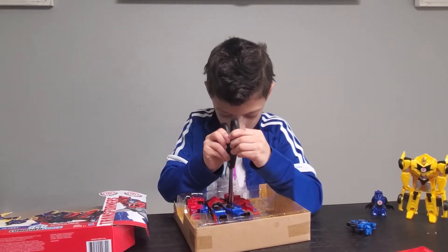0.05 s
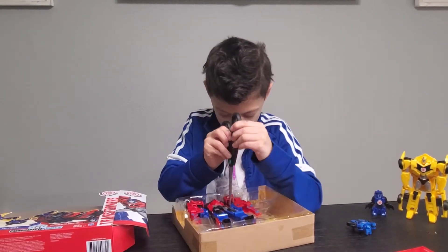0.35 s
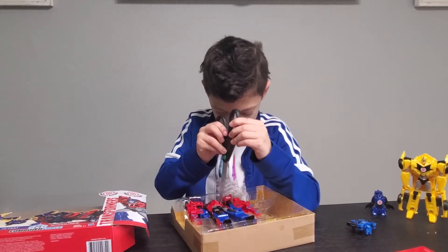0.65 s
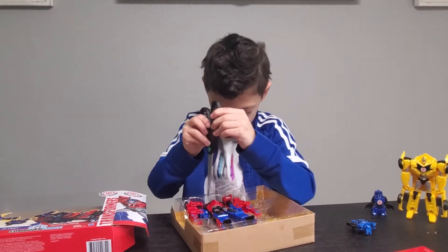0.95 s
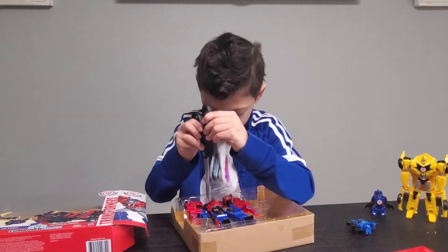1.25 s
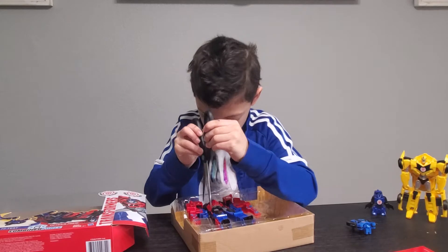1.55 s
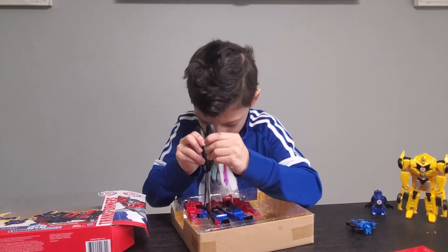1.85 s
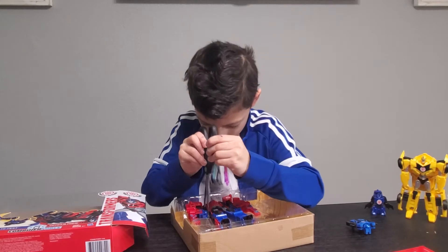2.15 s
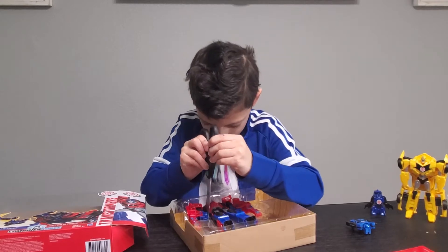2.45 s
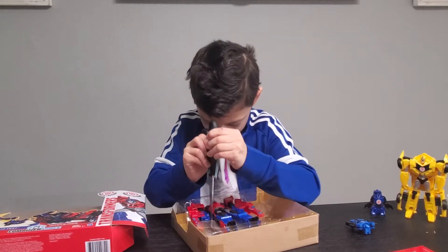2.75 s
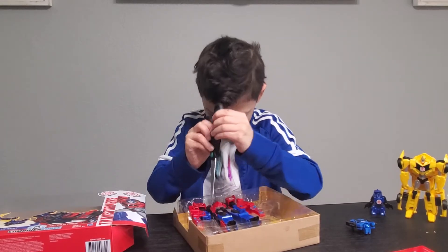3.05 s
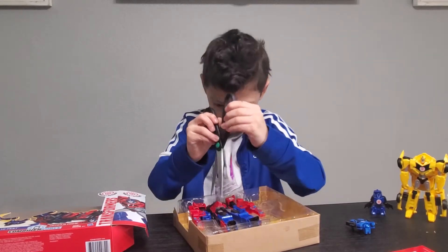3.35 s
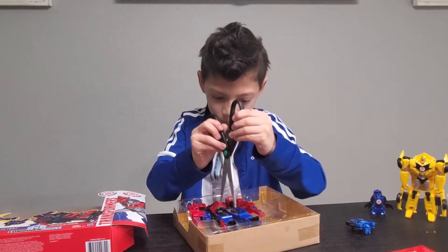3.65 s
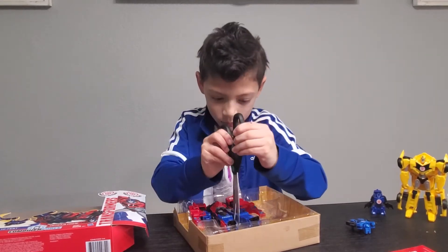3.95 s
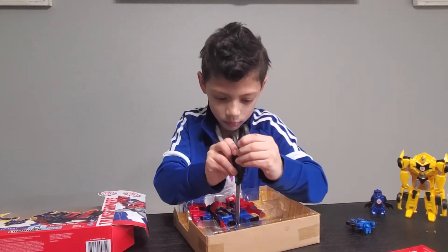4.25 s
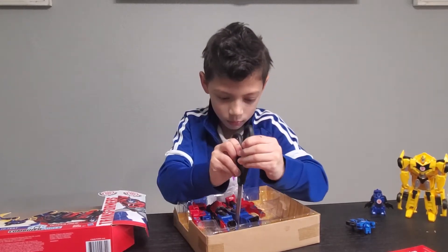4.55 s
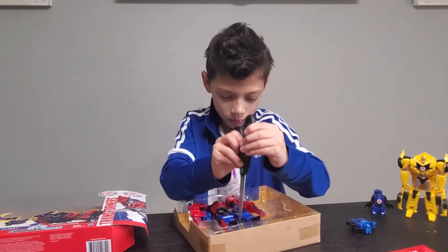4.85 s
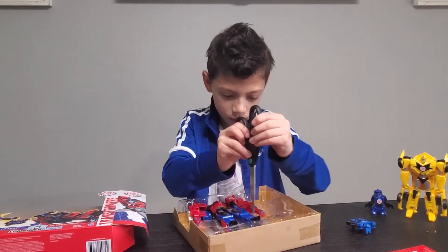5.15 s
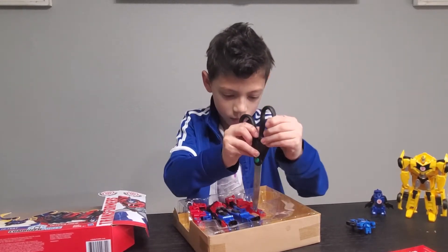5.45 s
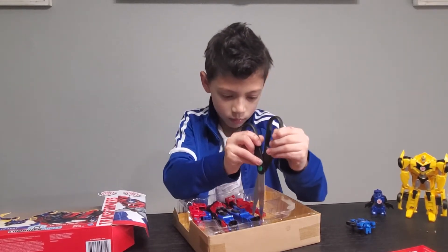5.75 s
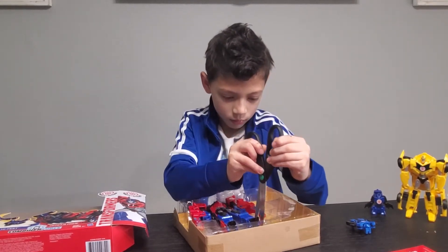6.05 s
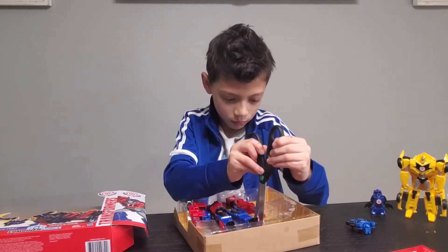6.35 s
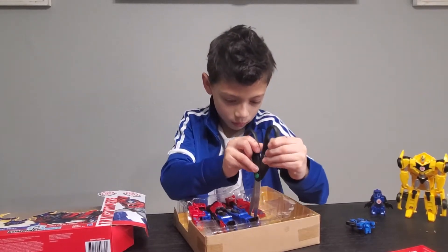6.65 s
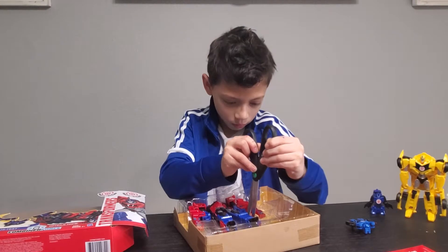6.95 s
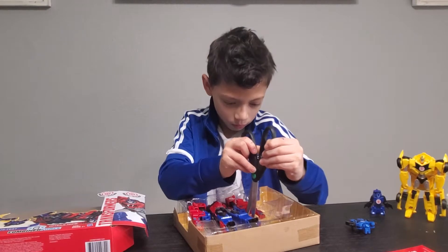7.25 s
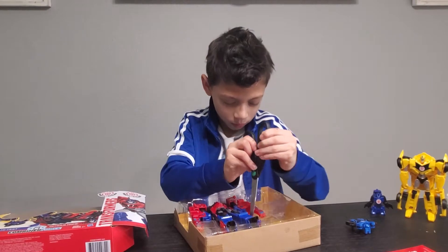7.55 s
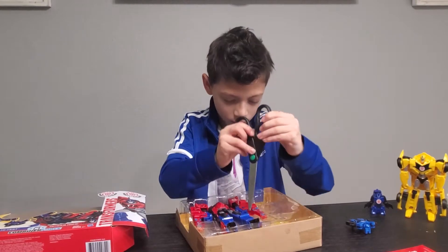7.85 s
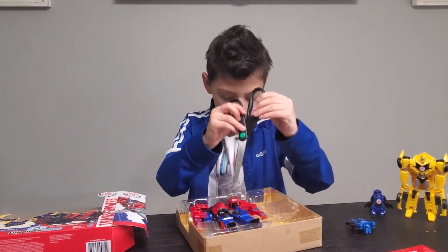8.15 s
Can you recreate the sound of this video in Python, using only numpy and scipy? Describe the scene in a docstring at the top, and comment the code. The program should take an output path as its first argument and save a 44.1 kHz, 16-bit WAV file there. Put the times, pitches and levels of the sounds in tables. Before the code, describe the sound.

Scissors cut a stiff plastic tray inside a cardboard box on a table. The loudest snaps come in the first half second, sharp cracks with hollow knocks, a low table thump and a short scrape. After a pause and a light blade tick at 1.3 seconds, more snaps run from about 1.9 to 2.8 seconds, strongest at 2.3, mixed with dull bumps and tiny steel squeaks. The blades click at 3.3 seconds. Small cracks and crinkles start around 4 seconds, followed by a plastic creak and sharper snaps between 4.5 and 4.8. The blades slide and click at 5.5 seconds. From 5.8 to 7.3 there is quieter bumping, scraping, flexing and crinkling. A final cluster of cracks and squeaks comes around 7.4 to 7.6 seconds. The small bare room rings briefly after each snap, and a faint low hum continues to the end, just past 8 seconds.

```python
"""Scissors cut a stiff plastic blister tray that sits in a cardboard box on a table.
The plastic tears in sharp snaps that knock tray and box, ring the hollow tray and shake the table.
Between snaps the blades bump, scrape, tick and squeak, and the sheet flexes and crinkles.
A small bare room rings after every snap, over a faint low hum."""
import sys
import numpy as np
from scipy import signal
from scipy.fft import rfft, irfft
from scipy.io import wavfile

SR = 44100
rng = np.random.default_rng(int(sys.argv[2]) if len(sys.argv) > 2 else 0)


def write(x):
    x = np.atleast_2d(x).T
    wavfile.write(sys.argv[1], SR, np.round(np.clip(x, -1, 1) * 32767).astype(np.int16))


N = 366768
LEAD = SR // 4  # samples ahead of time zero: the room is already ringing
ONSET_S, MIC_SPACING_M = 0.006, 0.13

# Room rumble. Each row: frequency in Hz, relative level in dB.
RUMBLE_SPECTRUM = [(25, -17), (62, 0), (80, -7.5), (120, -0.5), (300, -10.5), (500, -17), (800, -25),
                   (1300, -34), (2200, -40.5), (4000, -42), (5000, -45.5), (6000, -46), (8200, -51),
                   (13000, -44), (16000, -45.5)]
# Hum and a faint whine. Each row: frequency in Hz, rms level in dB.
HUM_TONES = [(98, -62), (237, -75), (297, -69.5), (3950, -101)]
# Room decay. Each row: frequency in Hz, T60 in seconds.
ROOM_DECAY = [(100, 0.24), (250, 0.6), (550, 0.5), (1400, 0.61), (3700, 0.53), (6000, 0.45), (10000, 0.41),
              (16000, 0.1787)]
# Microphone balance. Each row: frequency in Hz, left minus right in dB.
MIC_BALANCE = [(100, -1), (500, 1), (1000, 2), (2000, 0.8), (4000, -1), (8000, -8), (12000, -1)]

# Low and middle resonances that ring after each knock.
# Each row: frequency in Hz, gain in dB, T60 in seconds.
LOW_RING_MODES = [(187, -1.5, 0.12), (306.3, -2.5, 0.25), (332.7, 0, .18), (367, -6.5, 0.22),
                  (462, -8.5, 0.16), (494, -4.5, 0.079), (552.3, 0, 0.11)]
MID_RING_MODES = [(648, 5, 0.35), (718, 4, 0.16), (959, 0, 0.16), (1132, -1.5, 0.2), (1214, -4, .15),
                  (1370, -4, 0.18), (1760, -6.5, 0.079)]
# Ringing of plastic and blades after a crack, and of the blades alone.
# Each row: frequency in Hz, gain in dB, T60 in seconds.
CRACK_RING_MODES = [(3476, 1.5, 0.1), (3650, 5, 0.18), (3720, 3.5, 0.21), (3670, -0.5, 0.2),
                    (3880, 1.5, 0.16), (4420, -0.5, .15), (4600, -2, .15), (5150, -0.5, .1),
                    (5750, -0.5, 0.078), (6255, -2.5, .07), (6416, 0.5, .09)]
STEEL_MODES = [(3570, -24, 0.087), (4700, -4.5, 0.114), (5130, 7, 0.074), (6160, -1, 0.13), (7030, 13, 0.1),
               (7500, -7, .1), (11100, 13, 0.13), (11200, -12, 0.033), (11840, -12, 0.092), (12490, 5, .12)]
# Source spectra. Each row: frequency in Hz, relative level in dB.
BOX_SPECTRUM = [(40, -25), (100, -1.5), (190, -1), (310, -1), (570, 3), (700, -3.5), (1100, -34.5),
                (3000, -48.5)]
TRAY_SPECTRUM = [(250, -25.5), (480, -4), (650, -5), (1200, -6), (1600, -7), (2200, -6.5), (3200, -4.5),
                 (6000, -34)]
SCRAPE_SPECTRUM = [(100, -15.5), (300, -5.5), (550, -3), (900, -5), (1400, -13), (2400, -11), (3600, -12.5),
                   (6200, -9), (8000, -22), (16000, -24.5)]
TICK_SPECTRUM = [(300, -46), (1500, -29), (2900, -13), (3500, 0), (5500, 0.5), (7200, 4), (9000, -2.5),
                 (11500, 6.5), (16000, 1.5)]
CRACK_SPECTRUM = [(1200, -16), (2000, -3), (2600, -7), (3500, 2.5), (4400, -7.5), (5200, 0.5), (6500, -0.5),
                  (7300, -8), (8200, -23.5), (16000, -43)]
FIZZ_SPECTRUM = [(5000, -24), (7500, -9.5), (9000, -3), (11500, 1), (13500, -1), (16000, -4)]

# Hard cuts rock the table. Each row: start in seconds, gain in dB.
JOLTS = [(.252, -40.5), (4.757, -50.5), (7.52, -50.5)]
# The sheet crinkles. Each row: start in seconds, length in seconds, rms level in dB.
CRINKLES = [(4.029, 0.11, -64.5), (4.207, 0.088, -63.5), (5.801, 0.068, -60.5), (5.912, 0.11, -74),
            (6.402, 0.085, -61.5), (6.61, 0.062, -65.5), (6.921, .1, -65), (7.211, .07, -70),
            (7.49, .08, -51.5)]
# The sheet bends. Each row: start in seconds, length in seconds, level in dB, pitch in Hz.
FLEXES = [(4.48, 0.092, -54.5, 1106), (4.485, 0.048, -52.5, 760), (4.5, 0.081, -47.5, 506),
          (5.75, 0.042, -60, 1140), (6.01, 0.042, -59.5, 840), (6.14, 0.034, -62, 800),
          (6.367, 0.038, -61.5, 954), (6.604, 0.026, -70, 1150), (6.775, 0.039, -63, 873),
          (6.69, 0.048, -66.5, 830), (7.11, .05, -68, 970)]
# Blades drag. Each row: start in seconds, length in seconds, top level in dB, hump centre in Hz.
SCRAPES = [(-.03, 0.072, -51.5, 2010), (0.284, 0.12, -46, 900), (1.858, 0.098, -50, 930),
           (5.725, 0.34, -69.5, 1397), (6.408, 0.091, -59, 2990), (6.596, 0.094, -73.5, 1195),
           (6.904, 0.095, -61.5, 1390), (7.408, 0.24, -64, 900)]
# Blades click home. Each row: start in seconds, click length in seconds, level in dB,
# slide length in seconds, pitch ratio of the steel modes.
TICKS = [(1.298, 0.0076, -48.5, 0.019, 0.92), (3.342, 0.0026, -45, 0.016, 1.06),
         (3.759, 0.0034, -57, 0.0013, 0.87), (5.51, 0.011, -48, 0.061, 0.98),
         (7.355, 0.004, -63, 0.0039, 0.87)]
# Blades squeak. Each row: start in seconds, length in seconds, level in dB, pitch in Hz.
SQUEAKS = [(0.382, .003, -52, 6070), (0.586, 0.0031, -62, 5320), (1.859, 0.00075, -59, 6400),
           (1.872, 0.018, -55, 5300), (1.93, 0.0025, -56, 5400), (2.078, 0.0033, -39.5, 4880),
           (2.805, 0.0048, -36.5, 4970), (3.83, 0.0023, -68, 6670), (3.993, 0.0028, -61.5, 6450),
           (4.191, 0.0039, -63.5, 5570), (4.371, 0.0033, -66.5, 5860), (4.5885, 0.0022, -34, 6000),
           (4.601, 0.0049, -36.5, 5840), (4.741, 0.0032, -43, 4440), (4.756, 0.0032, -42, 6020),
           (6.038, 0.0026, -62.5, 7170), (6.139, 0.007, -70, 7050), (6.228, .0035, -77.5, 7330),
           (6.468, .004, -63, 5830), (6.616, 0.0023, -77, 6050), (6.64, .003, -66, 6600),
           (6.655, 0.0053, -70.5, 7250), (6.792, .0035, -69, 6480), (6.885, 0.0035, -58, 5400),
           (6.978, 0.003, -67.5, 7350), (6.994, 0.0027, -68, 7250), (7.07, 0.0032, -75.5, 7250),
           (7.151, .0035, -78.5, 7350), (7.351, .0035, -59, 6900), (7.39, 0.0024, -53, 5200),
           (7.401, 0.0089, -43, 4930), (7.492, 0.0028, -47, 5000), (7.535, .004, -49.5, 5900),
           (7.612, 0.0043, -62, 5900)]
# A blade slips. Each row: start in seconds, length in seconds, tray level in dB, tray pitch in Hz,
# click relative to tray in dB, box pitch in Hz.
BUMPS = [(-.05, 0.001, -34.5, 915, -14, 466), (0.5425, 0.001, -41, 910, -16, 429),
         (1.912, 0.0056, -47.5, 800, -21, 450), (2.474, 0.0037, -45.5, 900, -14.5, 480),
         (2.821, 0.0039, -44.5, 1190, -19, 496), (4.239, 0.0026, -48.5, 740, -13, 402),
         (4.378, 0.012, -50.5, 830, -10, 535), (4.581, 0.0027, -42, 1020, -14, 330),
         (4.86, 0.0041, -47.5, 907, -14, 400), (5.808, 0.0058, -49, 910, -15, 447),
         (5.834, 0.0053, -51, 930, -11.5, 428), (5.931, 0.0065, -53, 785, -16, 379),
         (5.996, 0.006, -58, 736, -9, 406), (6.017, .005, -57.5, 900, -10.5, 450),
         (6.408, 0.0018, -55, 900, -9, 448), (6.427, 0.01, -62.5, 1400, -8.5, 497),
         (6.468, 0.005, -57.5, 1530, -8, 500), (6.638, 0.0068, -52.5, 766, -19, 503),
         (6.945, 0.0085, -48, 867, -13.5, 406), (7.067, 0.00069, -51, 684, -25.5, 480),
         (7.218, 0.0072, -61.5, 875, -10.5, 400), (7.329, 0.0043, -58.5, 1120, -14.5, 500),
         (7.551, .008, -50, 700, -24, 330), (7.608, 0.0028, -52.5, 804, -17.5, 420),
         (7.618, 0.0053, -46, 995, -11.5, 449)]
# The plastic cracks. Each row: start in seconds, tear length in seconds, crack level in dB and pitch
# in Hz, fizz level in dB, tray level in dB and pitch in Hz, box level in dB and pitch in Hz,
# hollow ring level in dB and pitch in Hz, left minus right of the crack in dB.
SNAPS = [(0.1313, 0.0015, -25.5, 4430, -36.5, -25.5, 756, -31.5, 500.3, -32, 598, 2),
         (0.2253, 0.0087, -30, 5040, -31, -26, 1220, -34, 400, -28, 960, 2),
         (0.2313, 0.0035, -28.5, 4150, -35, -33, 1144, -35, 320, -34.5, 641.4, 1.5),
         (0.3862, 0.0022, -42.5, 5600, -49, -34, 1007, -39.5, 323, -35, 1139, 3),
         (1.857, 0.0016, -62, 5900, -63.5, -51, 870, -52.5, 403, -47.5, 874, -3.5),
         (1.8945, 0.0018, -56, 4540, -62, -46, 1050, -41, 450, -40.5, 943, 5),
         (1.9322, 0.003, -59, 5700, -56, -45.5, 960, -44, 417, -53.5, 625, 4),
         (2.0794, 0.0029, -43, 5260, -48, -43, 940, -41, 394, -42.5, 430.5, -1),
         (2.1, 0.0032, -52.5, 4000, -55, -40, 1410, -43, 480, -48, 446, 10),
         (2.2939, 0.0072, -31, 4480, -38, -31.5, 1230, -30, 420, -34, 561, 1.5),
         (2.7052, 0.0057, -49, 5150, -54.5, -42, 998, -44, 345, -38.5, 971, 0),
         (2.715, 0.014, -46, 4850, -53.5, -47, 1330, -49.5, 332, -45.5, 992, 2),
         (2.7615, 0.0025, -41.5, 4940, -49.5, -39.5, 1045, -41, 400, -35, 940, 2),
         (2.789, 0.0011, -43, 4640, -58, -39, 990, -52, 508, -50, 972, 0),
         (2.8047, 0.0028, -41.5, 4806, -43.5, -39, 974, -39, 460, -44, 596, 2.5),
         (3.9872, 0.0074, -60.5, 6200, -66.5, -54, 1020, -54.5, 500, -59, 790, -2),
         (4.0186, 0.002, -49, 5990, -51, -46, 1220, -48, 453, -67, 1010, 2),
         (4.59, 0.0026, -45.5, 5840, -46.5, -37.5, 950, -37, 330, -37, 317.6, -2),
         (4.6014, 0.002, -42, 6150, -42, -35, 1190, -41.5, 332, -41.5, 568, 5),
         (4.7375, 0.0032, -51, 4300, -56, -35, 890, -37.5, 380, -34.5, 542, 1),
         (4.757, 0.0017, -41.5, 5790, -45, -36, 1716, -39, 483, -32, 549, 2),
         (6.8863, 0.00092, -63.5, 6040, -66, -58.5, 1085, -52, 449, -58.5, 561, -1.5),
         (7.3965, 0.0016, -41.5, 6500, -41.5, -39, 856, -46, 537, -45.5, 915, 0),
         (7.4138, .003, -58, 5220, -59, -36.5, 1200, -37.5, 480, -38, 1362, 0),
         (7.4862, 0.0046, -50, 4800, -56, -37, 901, -40.5, 480, -54, 860, 3),
         (7.537, 0.0037, -55.5, 5400, -62, -55, 1020, -43, 399, -51, 537.4, 4)]


def amp(db):
    """Decibels to gain."""
    return 10 ** (np.asarray(db) / 20)


def lookup(points, hz):
    """Interpolates (Hz, value) rows on a log-frequency axis."""
    row_hz, value = np.transpose(points)
    return np.interp(np.log(hz + 1), np.log(row_hz + 1), value)


def unit_rms(x):
    """Scales to an rms of 1."""
    return x / np.sqrt(np.mean(x ** 2) + 1e-30)


def at_level(x, db):
    """Gives a short sound the energy of 10 ms at this rms level."""
    return x * amp(db) * np.sqrt(SR / 100 / (np.sum(x ** 2) + 1e-30))


def add(mix, start_s, sound):
    """Mixes a sound in at a time."""
    part = mix[..., max(LEAD + round(start_s * SR), 0):][..., :sound.shape[-1]]
    part += sound[..., :part.shape[-1]]


def colour(x, spectrum, centre_hz=None, focus_db=5.5):
    """Minimum-phase filter from a spectrum, with an optional broad hump round a centre."""
    hz = abs(np.fft.fftfreq(4096, 1 / SR))
    db = lookup(spectrum, hz)
    if centre_hz:
        db = db - focus_db * np.minimum(np.log2((hz + 1) / centre_hz) ** 2, 3)
    log_gain = np.log(amp(db))
    taps = np.fft.ifft(np.exp(np.conj(signal.hilbert(log_gain)))).real
    return signal.fftconvolve(x, taps[:len(taps) // 2])[:len(x)]


def ring_modes(push, t, modes):
    """Drives decaying modes; each blow lands elsewhere and weights them anew."""
    hz, db, t60_s = np.transpose(modes)[:, :, None]
    weight, polarity = rng.standard_normal((2, len(modes), 1))
    partials = np.sign(polarity) * amp(db + 2 * weight - 60 * t / t60_s) * np.sin(2 * np.pi * hz * t)
    return signal.fftconvolve(push, partials.sum(0))[:len(t)]


def resonate(push, t, hz, t60_s):
    """Drives one decaying mode, such as the patch of sheet under the blade."""
    return signal.fftconvolve(push, amp(-60 * t / t60_s) * np.sin(2 * np.pi * hz * t))[:len(t)]


def slip_burst(t, length_s, slips_per_s=2500, grit=0.16, whitening=0.98):
    """A quick run of tiny fractures or slips swells and dies, filling the band evenly."""
    slips = rng.standard_normal(len(t)) * (grit + (rng.random(len(t)) < slips_per_s / SR))
    age = 4 * np.maximum(t - ONSET_S, 0) / length_s
    spectrum = rfft(slips * age ** 2 * np.exp(-age))
    white = irfft(spectrum / (abs(spectrum) + 1e-9) ** whitening, len(t))
    return white * np.minimum(t / ONSET_S, 1) * np.exp(-(t / (ONSET_S + length_s) / 4) ** 2)


def shiver(x, t, decay_s, db):
    """Adds a noise tail: dense modes keep shivering after a blow."""
    power = signal.fftconvolve(x ** 2, np.exp(-2 * t / decay_s) * 2 / (decay_s * SR))[:len(x)]
    return x + amp(db) * np.sqrt(abs(power)) * rng.standard_normal(len(x))


def stereo(x, side_db=0, spread_db=-10):
    """The bent sheet radiates a different colour to each side; the right lags one sample."""
    taps = colour(rng.standard_normal(64), [(350, -18), (700, 0), (16000, -2)])
    spread = amp(spread_db) * signal.oaconvolve(x, unit_rms(taps) / np.sqrt(len(taps)))[:len(x)]
    return np.array([(x + spread) * amp(side_db / 2), (np.roll(x, 1) - spread) * amp(-side_db / 2)])


def diffuse(spectra, hz):
    """Sound from all sides: alike at both microphones in the bass, unrelated in the treble."""
    coherence = 0.96 * np.sinc(2 * hz * MIC_SPACING_M / 343)[:, None]
    return np.array([spectra[0], coherence * spectra[0] + np.sqrt(1 - coherence ** 2) * spectra[1]])


def room_rumble(rms_db=-58):
    """Steady low diffuse noise."""
    hz = np.fft.rfftfreq(2048, 1 / SR)
    real, imag = rng.standard_normal((2, 2, len(hz), N // 512 + 5))
    spectra = diffuse(real + 1j * imag, hz) * amp(lookup(RUMBLE_SPECTRUM, hz)[:, None])
    return amp(rms_db) * unit_rms(signal.istft(spectra, nperseg=2048, noverlap=1536)[1][:, :N])


def wavering_tone(t, hz, knots_s, depth):
    """Complex tone whose level and phase drift at random from knot to knot."""
    real, imag = rng.standard_normal((2, len(knots_s)))
    return (1 + depth * np.interp(t, knots_s, real + 1j * imag)) * np.exp(2j * np.pi * hz * t)


def room_hum():
    """Faint wavering tones."""
    t, knots_s = np.arange(N) / SR, np.linspace(0, N / SR, 70)
    return sum(amp(db) * unit_rms(wavering_tone(t, hz, knots_s, 0.52).real) for hz, db in HUM_TONES)


def room_response(early_db=4, early_s=0.025, rise_s=0.005):
    """Sparse reflections from table and near walls thicken into a tail that dies by band."""
    t = np.arange(SR) / SR
    taps = rng.standard_normal((2, SR)) * (rng.random((2, SR)) < np.minimum(0.03 + 3 * t, 0.5))
    taps /= np.sqrt(np.minimum(0.044 + 3 * t, 0.5))
    taps *= np.minimum(t / rise_s, 1) * amp(early_db * np.exp(-t / early_s))
    hz, frame_s, spectra = signal.stft(taps, SR, nperseg=256)
    decay = amp(-60 * frame_s / lookup(ROOM_DECAY, hz)[:, None])
    tail = signal.istft(diffuse(spectra, hz) * decay, SR, nperseg=256)[1]
    return tail / np.linalg.norm(tail, axis=1, keepdims=True)


def room_echoes(x, wet_db, cycle_s=1.3, count=3):
    """Reflections change as the hands move: a cyclic crossfade of room responses."""
    n = x.shape[1]
    turns = np.arange(n) / (cycle_s * SR) - np.arange(count)[:, None] / count
    fades = np.maximum(np.cos(2 * np.pi * turns), 0)
    fades /= np.linalg.norm(fades, axis=0)
    return amp(wet_db) * sum(signal.oaconvolve(x * f, room_response(), axes=1)[:, :n] for f in fades)


def table_booms(sway_hz=44, boom_hz=102, re_box_db=-20.5, lag_s=0.012):
    """The table top booms under each snap and sways most under hard cuts."""
    out, t = np.zeros(LEAD + N), np.arange(SR // 2) / SR
    sway = np.sin(2 * np.pi * sway_hz * t) * np.exp(-t / 0.052) * (1 - np.exp(-t / 0.016))
    boom = np.sin(2 * np.pi * boom_hz * t) * np.exp(-t / 0.14) * (1 - np.exp(-t / 0.03))
    for start_s, *_, box_db, _, _, _, _ in SNAPS:
        add(out, start_s + lag_s, amp(box_db + re_box_db) * (boom + 1.1 * sway))
    for start_s, db in JOLTS:
        add(out, start_s, amp(db) * (2 * sway + 1.3 * boom))
    return out


def sheet_crinkles(low_hz=604, high_hz=4220, patches=10, buckles_per_s=28, db_per_octave=-4.5):
    """Small patches buckle at random, each ringing briefly at its own pitch."""
    out, t = np.zeros((2, LEAD + N)), np.arange(SR // 5) / SR
    for start_s, length_s, db in CRINKLES:
        pressure = np.sqrt(abs(np.sin(np.pi * np.minimum(t / length_s, 1))))
        crinkle = 0
        for hz in np.geomspace(low_hz, high_hz, patches) * np.exp(0.086 * rng.standard_normal(patches)):
            sizes = amp(np.minimum(rng.exponential(1, len(t)), 3))
            buckles = sizes * (rng.random(len(t)) < buckles_per_s / SR)
            ring = resonate(buckles * pressure, t, hz, t60_s=22 / hz)
            crinkle += at_level(ring, db_per_octave * np.log2(hz / low_hz))
        rms = np.sqrt(np.sum(crinkle ** 2) / (length_s * SR) + 1e-30)
        add(out, start_s, stereo(amp(db) * crinkle / rms))
    return out


def sheet_creaks(slips_per_s=900):
    """The sheet bends slowly under the blade: a soft creak with no click."""
    out, t = np.zeros((2, LEAD + N)), np.arange(SR // 5) / SR
    for start_s, length_s, db, hz in FLEXES:
        slips = rng.standard_normal(len(t)) * (rng.random(len(t)) < slips_per_s / SR)
        push = shiver(slips, t, decay_s=0.0025, db=-1) * np.sin(np.pi * np.minimum(t / length_s, 1))
        creak = at_level(colour(resonate(push, t, hz, t60_s=0.036), TRAY_SPECTRUM), db)
        rub = at_level(colour(push, TRAY_SPECTRUM, hz, focus_db=21.5), db - 5)
        add(out, start_s, stereo(creak + rub))
    return out


def blade_scrapes(slips_per_s=1100, uneven_db=3):
    """A dragged blade sticks and slips, tapping the tray; the hand presses harder, then lets go."""
    out, t = np.zeros((2, LEAD + N)), np.arange(SR // 4) / SR
    for start_s, length_s, db, hz in SCRAPES:
        n = round(length_s * SR)
        sizes = amp(uneven_db * np.minimum(rng.exponential(1, n), 3)) * rng.choice([-1, 1], n)
        slips = sizes * (rng.random(n) < slips_per_s / SR)
        rasp = colour(shiver(slips, t, decay_s=0.0025, db=3.5), SCRAPE_SPECTRUM, hz, focus_db=1.5)
        pressure_db = np.interp(np.linspace(0, 1, n), [0, 0.76, 1], [db - 1.5, db, db - 9.5])
        add(out, start_s, stereo(amp(pressure_db) * signal.windows.tukey(n, 0.3) * unit_rms(rasp)))
    return out


def blade_ticks(ring_db=-11.5, slide_db=-7.5):
    """Steel slides on steel and clicks home: a swish into a bright ringing tick."""
    out, t = np.zeros((2, LEAD + N)), np.arange(SR // 5) / SR
    for start_s, length_s, db, slide_s, pitch_ratio in TICKS:
        click = colour(shiver(slip_burst(t, length_s), t, decay_s=0.014, db=-9), TICK_SPECTRUM)
        ring = ring_modes(slip_burst(t, length_s), t * pitch_ratio, STEEL_MODES)
        tick = at_level(click, db - 0.5) + at_level(ring, db + ring_db)
        add(out, start_s - ONSET_S, stereo(tick, side_db=1.5))
        rub = slip_burst(t, 2 * slide_s)
        rub_ring = ring_modes(rub, t * pitch_ratio, STEEL_MODES)
        slide = at_level(colour(rub, TICK_SPECTRUM), db) + at_level(rub_ring, db + ring_db)
        add(out, start_s - slide_s - ONSET_S, stereo(amp(slide_db) * slide))
    return out


def blade_squeaks(t60_s=0.0017):
    """Brief scratchy squeaks of steel on steel, loudest where the blades bite through."""
    out, t = np.zeros((2, LEAD + N)), np.arange(SR // 5) / SR
    for start_s, length_s, db, hz in SQUEAKS:
        scratch = resonate(slip_burst(t, length_s), t, hz, t60_s)
        squeak = resonate(scratch, t, hz, t60_s)
        add(out, start_s - ONSET_S, stereo(at_level(squeak, db)))
    return out


def knock(t, length_s, tray_db, tray_hz, box_db, box_hz, patch_db, focus_db, yield_s=0.0018):
    """The blade knocks tray and box, which yield more slowly than a crack runs; resonances ring on."""
    push = slip_burst(t, length_s + yield_s)
    mid_ring = ring_modes(push, t, MID_RING_MODES)
    low_ring = ring_modes(push, t, LOW_RING_MODES)
    tray_noise = shiver(push, t, decay_s=0.02, db=6.5)
    box_noise = shiver(push, t, decay_s=0.011, db=3)
    patch = resonate(push, t, tray_hz, t60_s=0.03)
    return (at_level(colour(tray_noise, TRAY_SPECTRUM, tray_hz, focus_db), tray_db - 2.5)
            + at_level(colour(patch, TRAY_SPECTRUM), tray_db + patch_db)
            + at_level(colour(mid_ring, TRAY_SPECTRUM, tray_hz, focus_db=1.5), tray_db - 8.5)
            + at_level(colour(box_noise, BOX_SPECTRUM, box_hz, focus_db=1.5), box_db - 1.5)
            + at_level(colour(low_ring, BOX_SPECTRUM, box_hz, focus_db=3), box_db - 5.5))


def crack(t, length_s, db, hz, fizz_db):
    """A tear cracks and fizzes in the sheet and sets it ringing."""
    slips = slip_burst(t, length_s)
    ring = ring_modes(slips, t, CRACK_RING_MODES)
    burst = shiver(slips, t, decay_s=0.004, db=-7)
    fizz = shiver(slips, t, decay_s=0.01, db=-4)
    return (at_level(colour(burst, CRACK_SPECTRUM, hz, focus_db=9.5), db)
            + at_level(resonate(slips, t, hz, t60_s=0.01), db - 7)
            + at_level(colour(ring, CRACK_SPECTRUM, hz, focus_db=-0.5), db - 12.5)
            + at_level(colour(fizz, FIZZ_SPECTRUM), fizz_db))


def blade_bumps(click_hz=5120):
    """A blade slips and the sheet only buckles: a dull knock with a faint click."""
    out, t = np.zeros((2, LEAD + N)), np.arange(SR // 3) / SR
    for start_s, length_s, tray_db, tray_hz, click_db, box_hz in BUMPS:
        click = crack(t, length_s, tray_db + click_db, click_hz, fizz_db=tray_db + click_db - 17.5)
        thud = knock(t, length_s, tray_db, tray_hz, tray_db + 2, box_hz, patch_db=-5, focus_db=6.5)
        add(out, start_s - ONSET_S, stereo(click + thud))
    return out


def hollow_rings(rise_cycles=4, t60_cycles=85, waver_s=0.005):
    """Each snap rings the hollow tray at one rough pitch, set by where the blades hold it."""
    out, t = np.zeros((2, LEAD + N)), np.arange(SR // 3) / SR
    for start_s, *_, db, hz, _ in SNAPS:
        tone = wavering_tone(t, hz, np.arange(200) * waver_s, depth=0.75).imag
        envelope = (1 - np.exp(-hz * t / rise_cycles)) * amp(-60 * hz * t / t60_cycles)
        add(out, start_s, stereo(at_level(tone * envelope, db)))
    return out


def plastic_snaps(run_up_db=-9):
    """Small fractures run ahead, then the sheet cracks through and knocks tray and box."""
    out, t = np.zeros((2, LEAD + N)), np.arange(SR // 3) / SR
    for start_s, length_s, crack_db, crack_hz, fizz_db, *tray_and_box, _, _, side_db in SNAPS:
        ahead_s = 2 * length_s
        fractures = slip_burst(t, 2 * ahead_s)
        run_up = at_level(colour(fractures, CRACK_SPECTRUM), crack_db)
        run_up += at_level(colour(fractures, FIZZ_SPECTRUM), fizz_db)
        add(out, start_s - ahead_s - ONSET_S, stereo(amp(run_up_db) * run_up, side_db))
        add(out, start_s - ONSET_S, stereo(crack(t, length_s, crack_db, crack_hz, fizz_db), side_db))
        add(out, start_s - ONSET_S, stereo(knock(t, length_s, *tray_and_box, patch_db=-10, focus_db=5)))
    return out


def scene():
    """Scissors and tray in the room, over its hum."""
    cutting = plastic_snaps() + blade_bumps() + sheet_creaks() + sheet_crinkles()
    cutting += blade_ticks() + blade_squeaks() + blade_scrapes()
    hollow = hollow_rings()
    echoes = room_echoes(cutting + amp(-5) * hollow, wet_db=-3)
    table = stereo(table_booms(), side_db=2)
    return (cutting + hollow + echoes + table)[:, LEAD:] + room_rumble() + room_hum()


def record(dry, cutoff_hz=16100):
    """Two microphones of slightly unequal colour, then a low-pass."""
    balance_db = lookup(MIC_BALANCE, np.fft.rfftfreq(N, 1 / SR))
    heard = irfft(rfft(dry) * amp(np.array([balance_db, -balance_db]) / 2), N)
    lowpass = signal.firwin(511, cutoff_hz, window=("kaiser", 9), fs=SR)
    return signal.oaconvolve(heard, lowpass[None], "same")


dry = scene()
out = record(dry)
write(out)
```